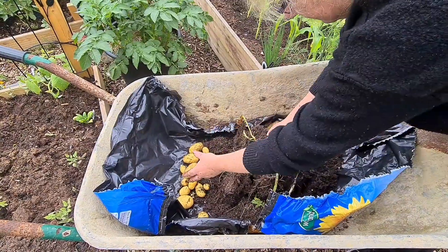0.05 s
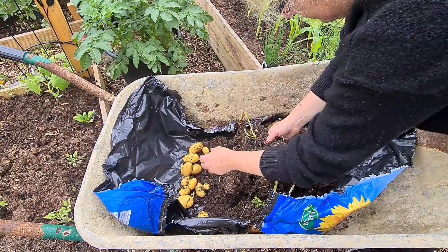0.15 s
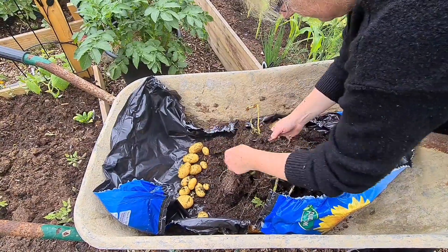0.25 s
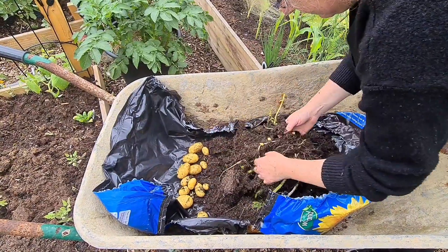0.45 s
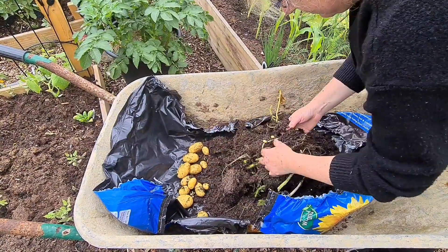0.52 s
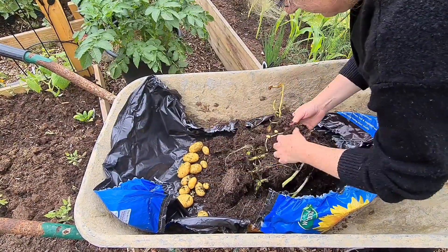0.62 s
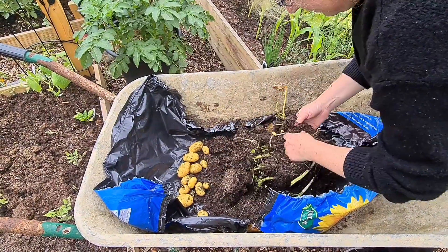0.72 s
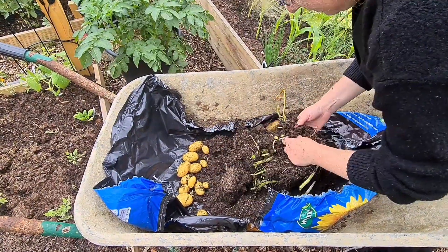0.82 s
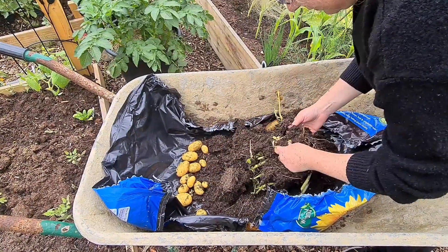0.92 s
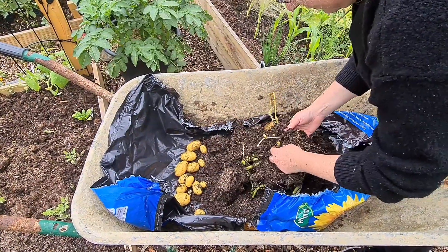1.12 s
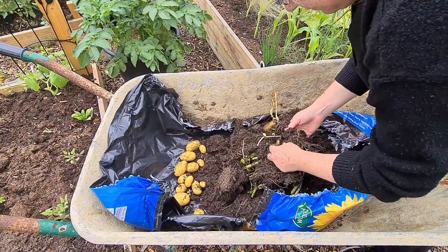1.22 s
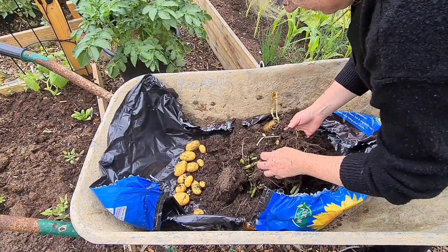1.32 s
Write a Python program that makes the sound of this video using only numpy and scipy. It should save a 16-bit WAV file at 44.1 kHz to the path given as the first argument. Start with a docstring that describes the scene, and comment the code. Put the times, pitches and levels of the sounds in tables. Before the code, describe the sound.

A potato lands with a hollow thud on a small pile in a plastic-lined wheelbarrow, tumbles and knocks once more. Soil and plastic rustle softly close to the microphone, outdoors, over a low rumble and faint far traffic.

```python
"""A potato drops on a small pile in a sack-lined wheelbarrow, outdoors, close to the microphone.
The tub booms as each blow rings its modes; the potato tumbles and knocks once more.
Soil crumbs and the plastic sack rustle and tick, mostly left of centre.
Behind them lie a low rumble, a faint drone and the wash of far traffic off to the right."""
import sys
import numpy as np
from scipy import signal
from scipy.fft import rfft, irfft
from scipy.io import wavfile

SR = 44100
rng = np.random.default_rng(int(sys.argv[2]) if len(sys.argv) > 2 else 0)


def store_wav(level_fs):
    """Save 16-bit WAV to argv[1]."""
    pcm = np.round(np.clip(np.atleast_2d(level_fs), -1, 1) * 32767)
    wavfile.write(sys.argv[1], SR, pcm.T.astype(np.int16))


N = 59535
TIME = np.arange(N) / SR
FREQS = np.maximum(np.arange(N + 1) * SR / (2 * N), 1)


def from_db(db):
    """Decibels to gain."""
    return 10 ** (np.asarray(db) / 20)


def at_hz(points):
    """Read a table on a log-frequency axis."""
    hz, value = np.transpose(points)
    return np.interp(np.log(FREQS), np.log(hz), value)


def pan(db):
    """Left and right gains; positive dB leans left."""
    return from_db(np.array([[.5], [-.5]]) * db)


def decay(start, t60):
    """An envelope that jumps to 1 and falls 60 dB in t60 seconds."""
    age = TIME - start
    return (age >= 0) * np.exp(-np.log(1000) * np.maximum(age, 0) / t60)


def white():
    """Two unrelated noises, twice the scene's length."""
    return rng.standard_normal((2, 2 * N))


def colour(pair, spectrum_db, correlation, left_lag_s=0):
    """Two unrelated signals become a stereo one with this spectral shape and correlation; rms 1."""
    mid, side = rfft(pair) * from_db(spectrum_db)
    alike = np.clip(correlation, -1, 1)
    mid, side = mid * np.sqrt(1 + alike), side * np.sqrt(1 - alike)
    left = (mid + side) * np.exp(-2j * np.pi * FREQS * left_lag_s)
    stereo = irfft(np.array([left, mid - side]))[:, :N]
    return stereo / np.sqrt(np.mean(stereo ** 2))


# Open-air rumble all around: (frequency [Hz], relative level [dB])
RUMBLE_SPECTRUM = [(15, -18.5), (30, -12.5), (42, -5), (52, 1), (66, -5.5), (90, -6.5), (115, -16),
                   (150, -28), (300, -40)]
def rumble_and_drone():
    """A steady low rumble and a faint far drone, nearly alike on both sides of the microphone."""
    drone_hz, width_hz = 230.6, 16
    rumble_db = at_hz(RUMBLE_SPECTRUM) - 60 * (FREQS > 400)
    drone_db = -20 * np.log10(1 + (2 * (FREQS - drone_hz) / width_hz) ** 2)
    rumble = from_db(-36.5) * colour(white(), rumble_db, correlation=0.97)
    drone = from_db(-59) * colour(white(), drone_db, correlation=0.97)
    return rumble + drone


# Traffic heard from far off: (frequency [Hz], relative level [dB])
TRAFFIC_SPECTRUM = [(100, -18), (170, 1), (235, -7), (320, -6.5), (480, -7), (700, 2), (900, 0),
                    (1200, 1.5), (1600, -9), (2050, -12.5), (2500, -23.5), (3400, -25.5), (4300, -30.5),
                    (5200, -41), (7000, -45.5), (8500, -58), (13000, -50), (16000, -53)]
# Its image, wider in the treble: (frequency [Hz], left-right correlation [0-1])
TRAFFIC_CORRELATION = [(150, 0.99), (400, 0.9), (1000, 0.49), (2500, 0.22), (8000, 0.1)]
def far_traffic():
    """A steady wash from the right, reaching the left side of the microphone later."""
    wash = colour(white(), at_hz(TRAFFIC_SPECTRUM), at_hz(TRAFFIC_CORRELATION), left_lag_s=0.00039)
    return from_db(-44) * wash


# Image of all close sounds at the barrow: (frequency [Hz], left-right correlation [0-1])
CLOSE_CORRELATION = [(300, 0.87), (1000, 0.85), (4000, 0.29), (12000, 0.33)]
# Soil and sack stirring in the tub: (time [s], level [dB])
RUSTLE_LEVELS = [(0, -59), (0.03, -76.5), (0.105, -68), (0.125, -83), (0.2, -71.5), (0.212, -56.5),
                 (0.25, -61.5), (0.30, -63), (0.34, -57.5), (0.375, -66.5), (0.44, -67.5), (0.52, -86),
                 (0.9, -87), (1.22, -90), (1.255, -76.5), (1.29, -84), (1.35, -84)]
# Soil on plastic, heard close: (frequency [Hz], relative level [dB])
RUSTLE_SPECTRUM = [(1000, 1.5), (2000, 8), (3800, 4.5), (5200, -1.5), (7300, -4), (9300, -13),
                   (12000, -6.5), (16000, -14)]
def soil_rustle():
    """Dense tiny grains of soil slide on the plastic, close and to the left."""
    grains_per_s, spread_db = 7600, 2
    onsets = rng.random((2, 2 * N)) < grains_per_s / SR
    grains = onsets * white() * from_db(spread_db * np.minimum(rng.exponential(1, (2, 2 * N)), 5))
    level = from_db(np.interp(TIME, *np.transpose(RUSTLE_LEVELS)))
    return level * pan(db=5.7) * colour(grains, at_hz(RUSTLE_SPECTRUM), at_hz(CLOSE_CORRELATION))


# Sack and crumbs, close by: (time [s], level [dB], left over right [dB], treble tilt [dB/octave])
SACK_TICKS = [(0.0272, -47.5, 1, 7.5), (0.032, -51.5, 5, 2), (0.0668, -40.5, 5.5, -4.5),
              (0.097, -59.5, -1, 6), (0.110, -66, 6, -0.5), (0.2078, -46, 12, -1.5),
              (0.2104, -44.5, -1.5, -2.5), (0.228, -45, 0.5, -3.5), (0.255, -47.5, 6.5, -1),
              (0.2765, -55.5, 5.5, 10), (0.327, -50, 2, -8), (0.337, -54, 2.5, -19), (0.353, -51, 7, -2.5),
              (0.595, -82, 6, 14), (0.7005, -71, -5, 6), (0.967, -60, 8, -4), (1.009, -66, 3, -1),
              (1.118, -72, 3, 2), (1.248, -60, 3, 0), (1.2565, -61, -1.5, -4)]
# A tick before its tilt: (frequency [Hz], relative level [dB])
TICK_SPECTRUM = [(1000, -12.5), (2500, 3), (3800, 2.5), (5200, -3), (7000, -1), (9500, -11), (12500, -10.5),
                 (16000, -21.5)]
def sack_ticks():
    """Creases snap and crumbs hit the sack: very short bursts with a faint tail."""
    out = np.zeros((2, N))
    octaves = np.maximum(np.log2(FREQS / 6000), -2)  # the tilt levels off below 1500 Hz
    for start, db, pan_db, tilt in SACK_TICKS:
        burst = colour(white(), at_hz(TICK_SPECTRUM) + tilt * octaves, at_hz(CLOSE_CORRELATION))
        envelope = decay(start, t60=0.011) + from_db(-20.5) * decay(start, t60=0.05)
        out += from_db(db) * pan(pan_db) * burst * envelope
    return out


def excitation(hz, high_hz, low_hz):
    """How well a blow excites this frequency: soft heavy ones favour lows, light hard ones highs."""
    steepness = 10.3
    return 1 / np.sqrt((1 + (hz / high_hz) ** steepness) * (1 + (low_hz / hz) ** steepness))


# The potato lands, rocks, knocks a neighbour and settles:
# (time [s], ring level [dB], upper band edge [Hz], lower band edge [Hz], clatter level [dB])
POTATO_BLOWS = [(0.2078, -10.0, 678, 110, -32.5), (0.2216, -13.5, 334, 104, -59.5),
                (0.2293, -37, 900, 520, -38.5), (0.2690, -17, 333, 250.4, -46.5),
                (0.3525, -13.5, 1496, 432, -37), (0.413, -38.5, 398, 119.5, -55)]
# Clear modes of the loaded tub: (frequency [Hz], relative level [dB], t60 [s], left over right [dB])
TUB_MODES = [(219, -10.5, 0.094, -4), (248.5, 1, .24, 0), (269.6, 2, 0.3, -2.5), (308.4, -17.5, 0.3, 1),
             (343, -11, 0.2, -4.5), (400.4, -19.5, .27, 5), (428, -29, 0.42, 5), (459, -16, 0.21, -4),
             (520, -28.5, .07, 9), (583.6, -18.5, 0.23, -5.5), (624.5, -22, 0.19, 3),
             (728, -28.5, 0.2, -6.5), (983, -20, 0.065, 0.5), (1198, -28.5, 0.13, 11)]
# Its many weak, crowded modes: (frequency [Hz], relative level [dB])
CLATTER_SPECTRUM = [(150, -29.5), (300, -3.5), (550, 11), (800, -1), (1200, -5), (1700, -15.5), (3000, -21),
                    (6000, -48.5)]
def potato_in_tub():
    """Close to the microphone, each blow rings the tub's clear modes and a clatter of crowded ones."""
    contact_s = 0.0012
    out = np.zeros((2, N))
    for start, ring_db, high_hz, low_hz, clatter_db in POTATO_BLOWS:
        age = np.maximum(TIME - start, 0)
        attack = np.sin(np.pi / 2 * np.minimum(age / contact_s, 1)) ** 2
        for hz, mode_db, t60, pan_db in TUB_MODES:
            polarity = -1 if 260 < hz < 500 else 1  # these modes swing against the others
            ring = polarity * attack * decay(start, t60) * np.sin(2 * np.pi * hz * age)
            out += excitation(hz, high_hz, low_hz) * from_db(ring_db + mode_db) * pan(pan_db) * ring
        band_db = 20 * np.log10(excitation(FREQS, high_hz, low_hz))
        clatter = colour(white(), at_hz(CLATTER_SPECTRUM) + band_db, at_hz(CLOSE_CORRELATION))
        out += from_db(clatter_db) * attack * decay(start, t60=0.19) * clatter
    return out


def scene():
    """The wheelbarrow up close against the distant background, from one spot in a garden."""
    return rumble_and_drone() + far_traffic() + soil_rustle() + sack_ticks() + potato_in_tub()


def record(dry):
    """The stereo microphone's signal passes through a steep low-pass."""
    cutoff_hz = 15800
    return signal.sosfilt(signal.ellip(10, .1, 80, cutoff_hz, fs=SR, output="sos"), dry)


dry = scene()
out = record(dry)
store_wav(out)
```